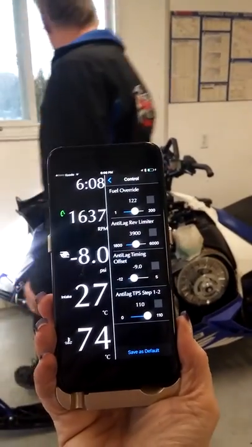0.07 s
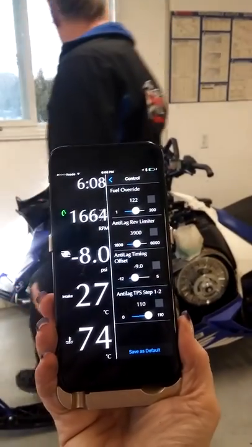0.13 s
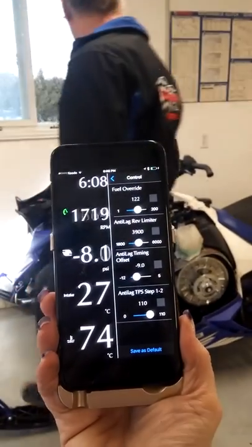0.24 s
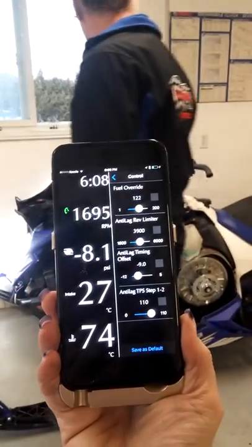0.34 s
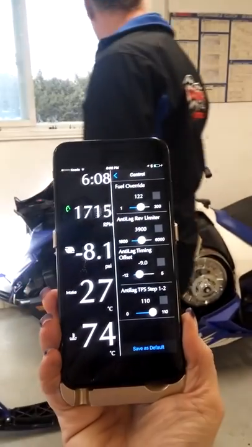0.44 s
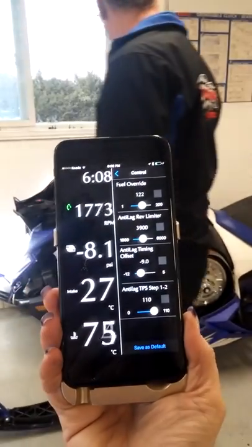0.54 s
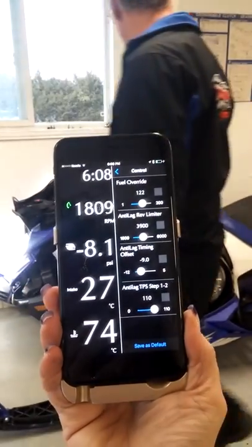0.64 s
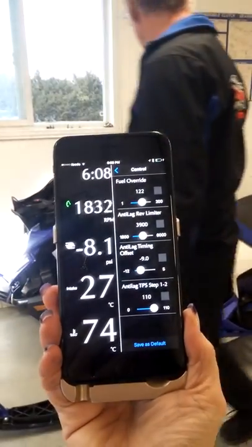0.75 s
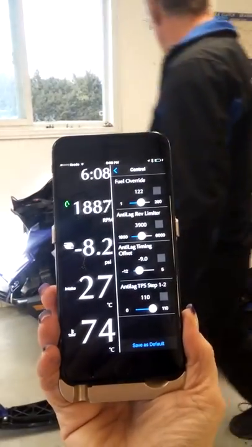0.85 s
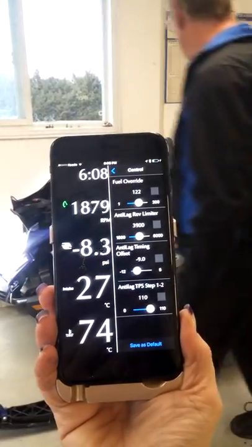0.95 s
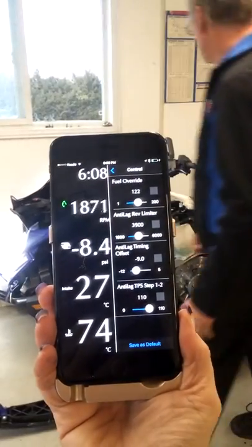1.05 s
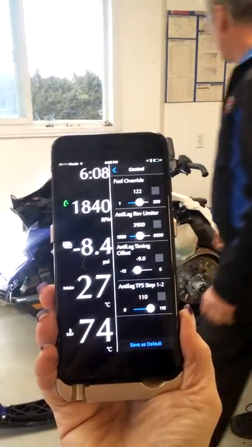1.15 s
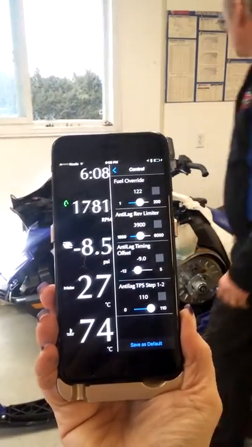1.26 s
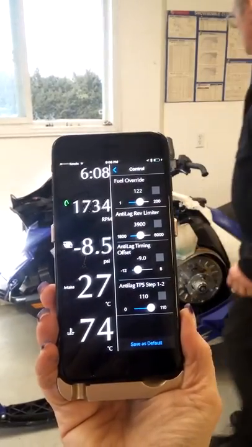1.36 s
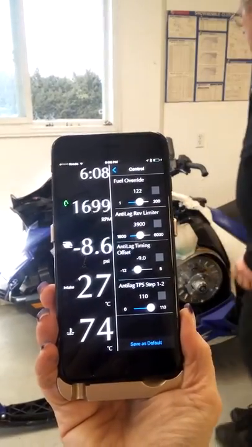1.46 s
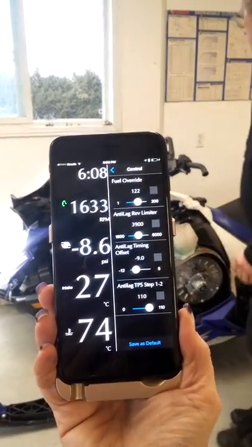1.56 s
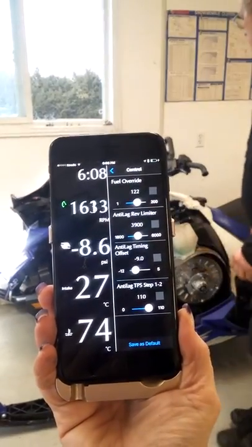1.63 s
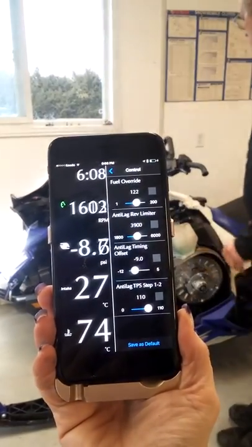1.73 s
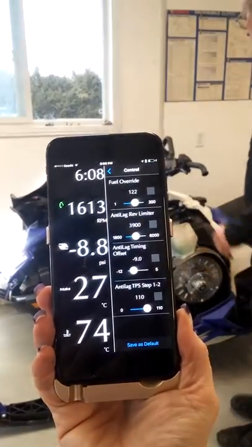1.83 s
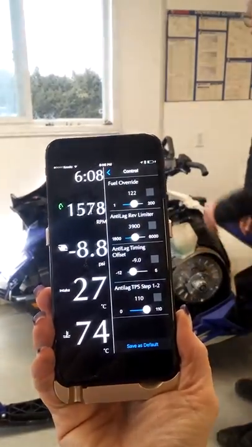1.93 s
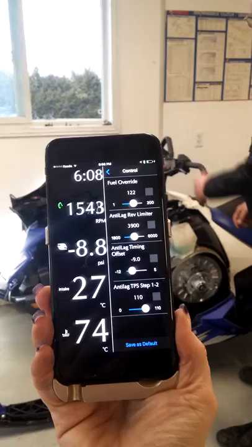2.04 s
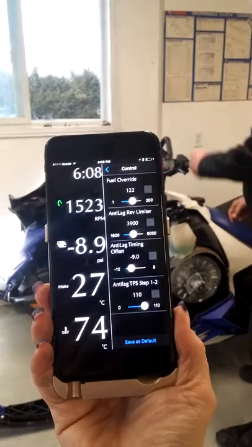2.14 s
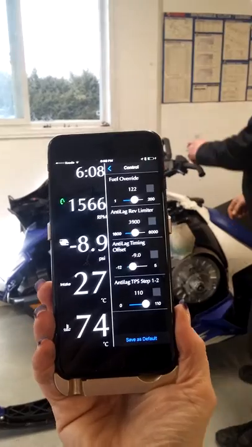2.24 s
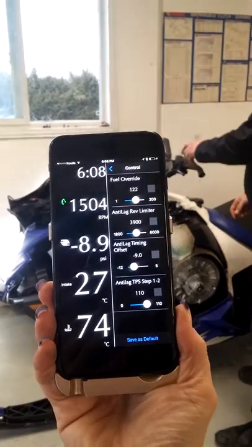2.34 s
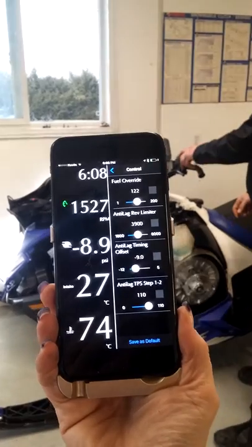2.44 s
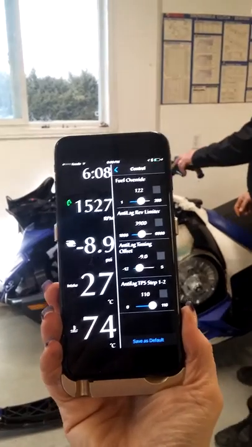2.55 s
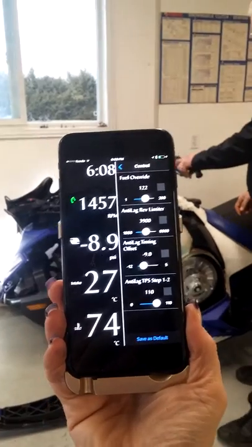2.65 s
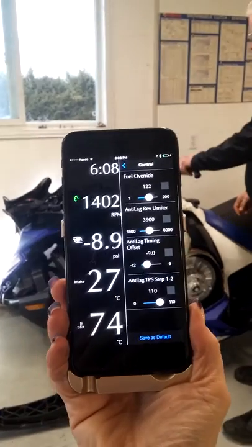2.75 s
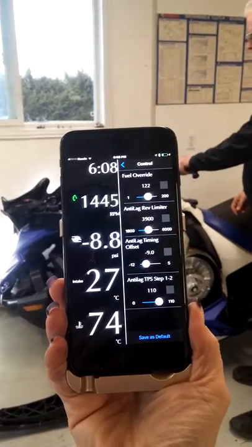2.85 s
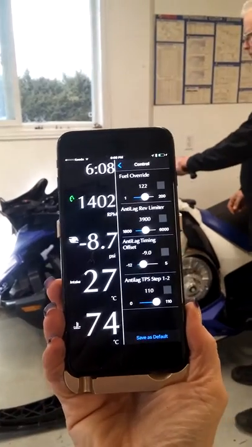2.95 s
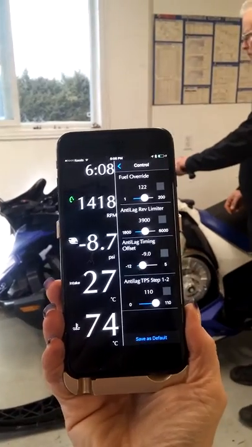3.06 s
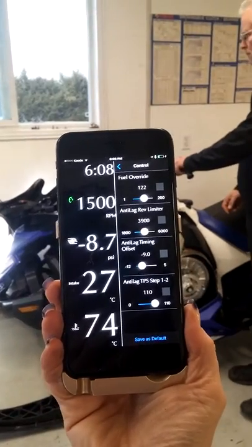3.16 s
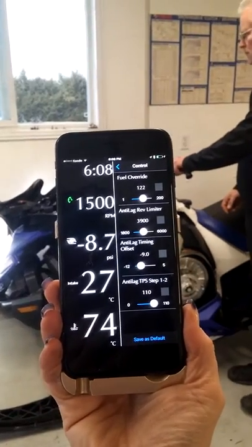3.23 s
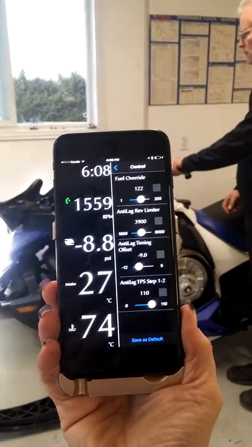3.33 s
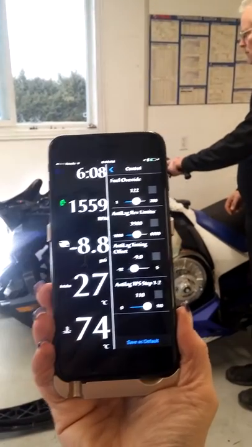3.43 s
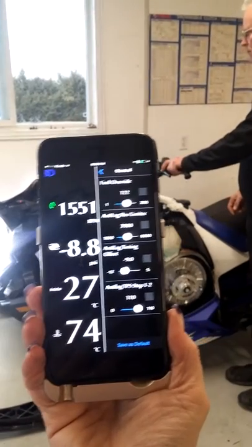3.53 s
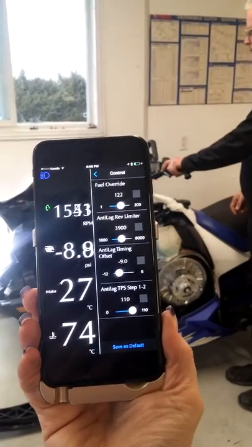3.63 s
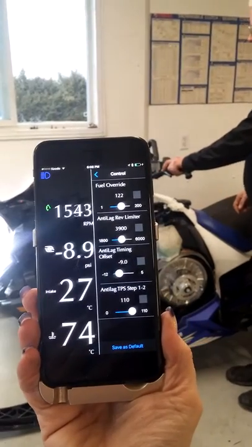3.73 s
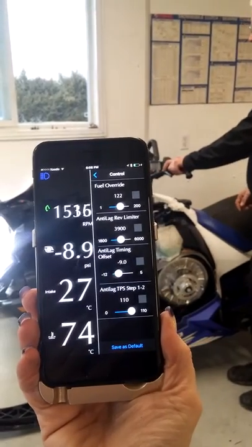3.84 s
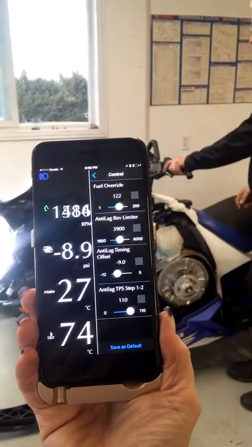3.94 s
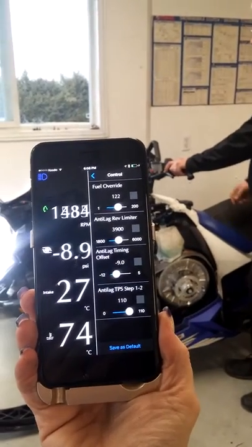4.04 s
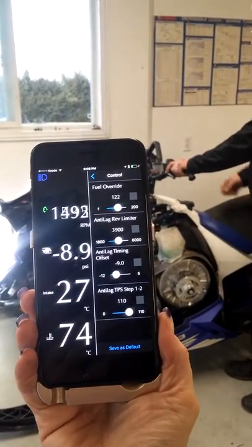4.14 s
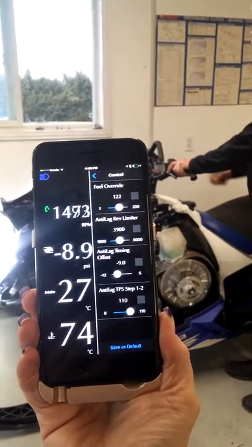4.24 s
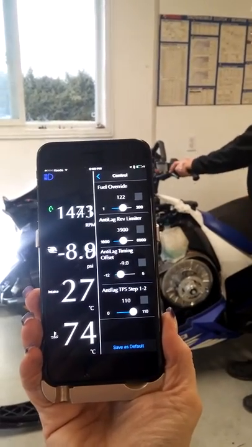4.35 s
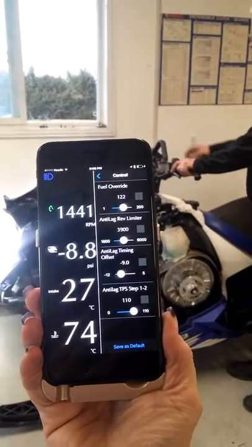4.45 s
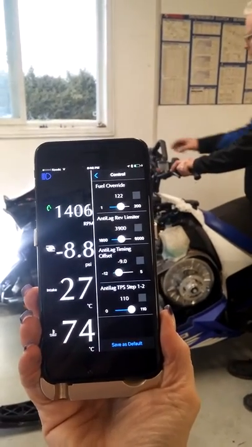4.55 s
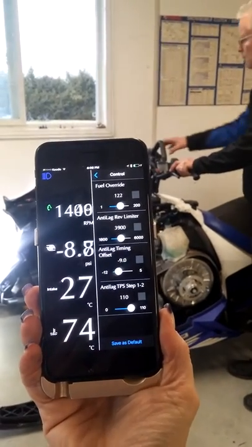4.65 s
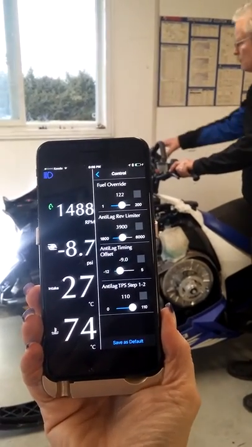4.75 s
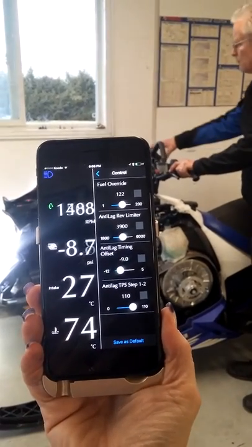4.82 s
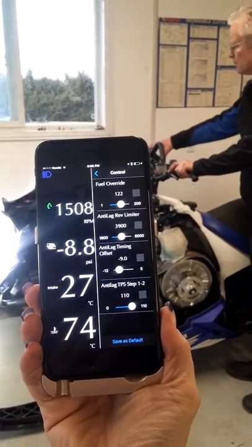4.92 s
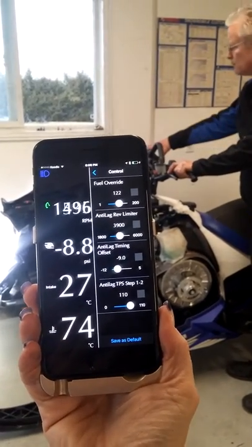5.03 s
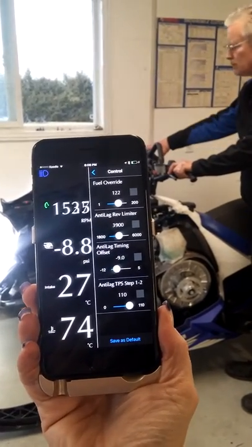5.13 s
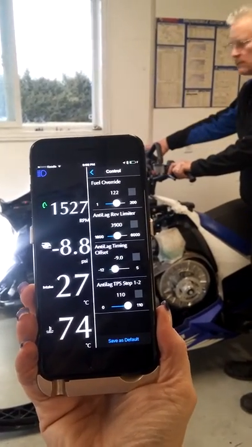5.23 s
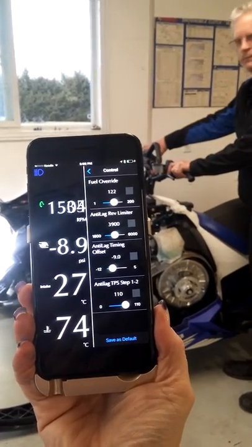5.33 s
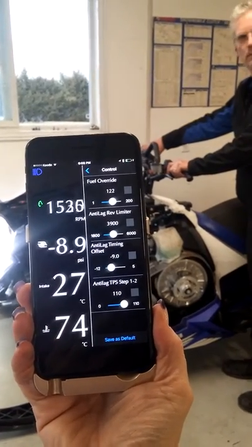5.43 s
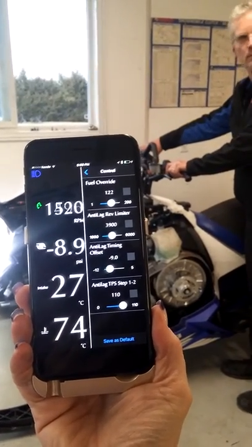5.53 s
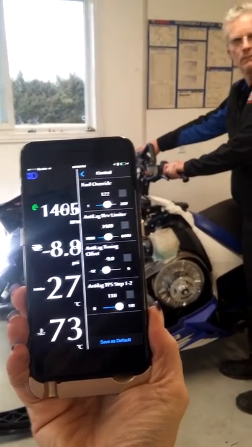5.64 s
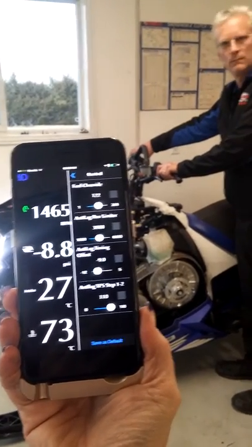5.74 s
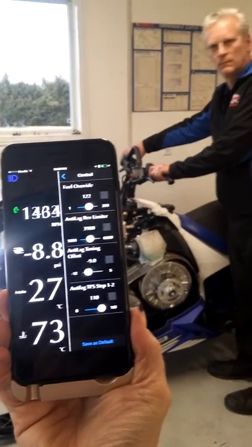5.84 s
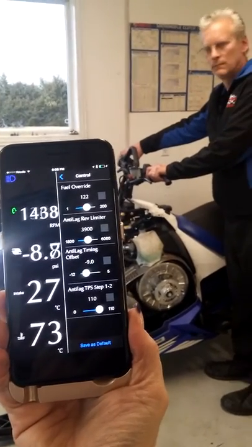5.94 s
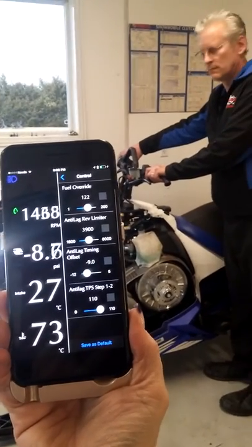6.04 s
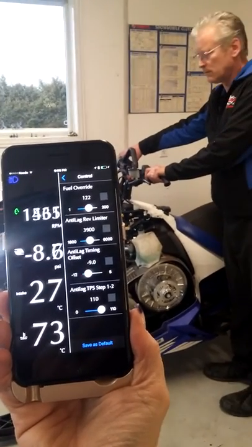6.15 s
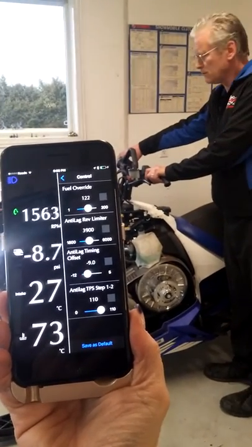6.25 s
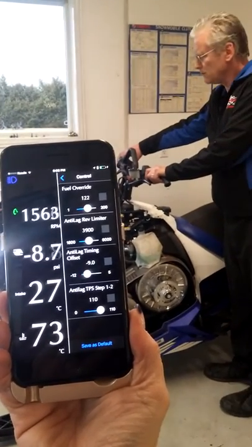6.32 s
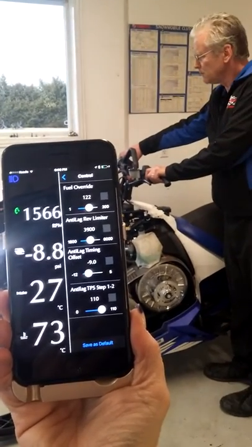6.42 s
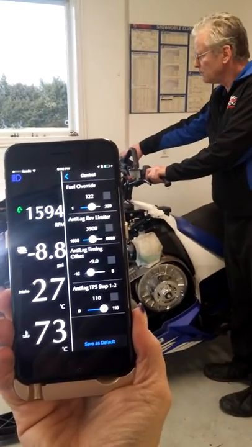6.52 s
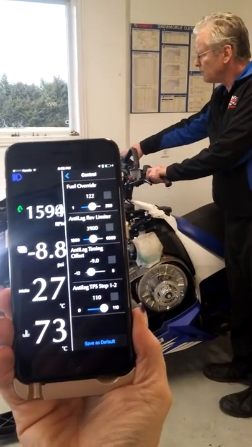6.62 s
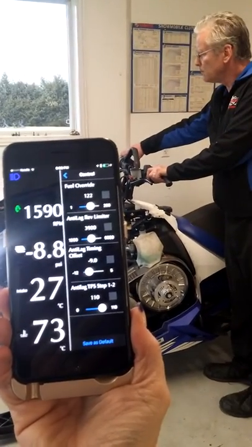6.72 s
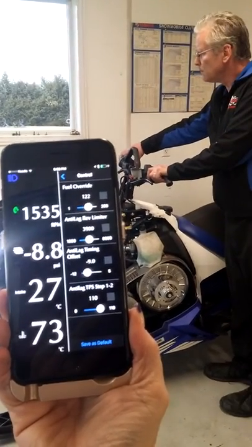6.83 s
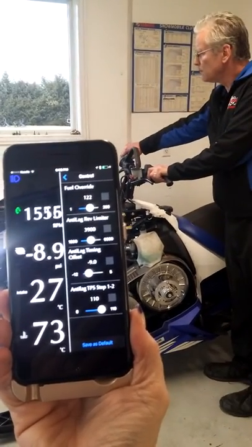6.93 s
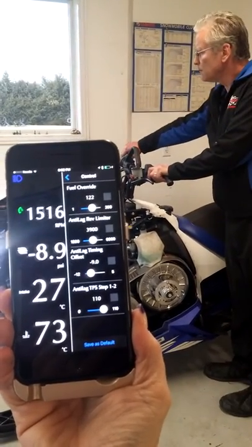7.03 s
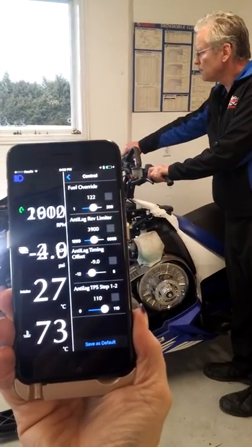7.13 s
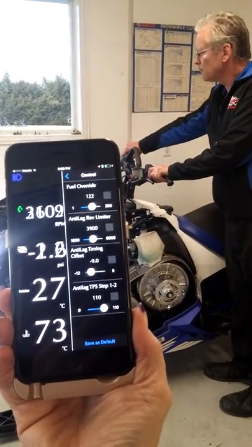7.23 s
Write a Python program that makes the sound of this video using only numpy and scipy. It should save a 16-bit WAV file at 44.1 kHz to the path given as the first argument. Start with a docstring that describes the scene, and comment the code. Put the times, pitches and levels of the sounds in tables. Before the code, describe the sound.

Uneven low engine idle with metallic clatter and airy intake hiss indoors, suddenly broken by a throttle stab and a volley of distorted exhaust explosions.

```python
"""A turbocharged three-cylinder snowmobile idles unevenly in a workshop, then the throttle is stabbed open.
Exhaust pulses, harmonics of the firing rate, sweep through fixed pipe and room resonances.
Over them lie clatter and intake hiss, noise gated by the crank, and early on a brief deep rumble.
At the end the anti-lag fires volleys of bangs, swinging tones with a noise roar, which overload the microphone."""
import sys
import numpy as np
from scipy import signal
from scipy.fft import rfft, irfft
from scipy.io import wavfile
from scipy.ndimage import uniform_filter1d, minimum_filter1d

SR = 44100
rng = np.random.default_rng(int(sys.argv[2]) if len(sys.argv) > 2 else 0)


def unload_audio(sound):
    """Save the sound as a 16-bit wav file, at the path given as the first command line argument."""
    columns = np.transpose(np.atleast_2d(sound))
    # keep every value between -1 and 1, then stretch to whole-number steps
    steps = np.round(np.clip(columns, -1, 1) * 32767)
    wavfile.write(sys.argv[1], SR, steps.astype(np.int16))


N = 321048
LEAD = SR // 4  # samples: the engine is already running before time zero
TIME = np.arange(-LEAD, N) / SR  # s
LENGTH = LEAD + N
SIZE = 2 ** 19  # transform length, samples
HZ = np.fft.rfftfreq(SIZE, 1 / SR)
FIRINGS = 512  # random draws are made for this many firings

# how hard the cylinders fire: [t/s, level above idle/dB]
EFFORT_CURVE = [(0, 8.5), (.9, 7.5), (1.4, 2), (2.3, 0), (6.9, 0)]
# the three cylinders in firing order: [strength/dB, lateness/share of one firing]
CYLINDER_TRAITS = [(1.42, 0.0027), (0.5, 0.0066), (0.9, -0.0021)]


def gain_of(db):
    """Decibels to amplitude gain."""
    return 10 ** (np.asarray(db) / 20)


def evened(x):
    """Scales to unit rms."""
    return x / np.sqrt(np.mean(x ** 2) + 1e-20)


def curve(rows):
    """A control curve at every sample, straight between its points."""
    return np.interp(TIME, *np.transpose(rows))


def shape(points, modes=()):
    """A spectrum in dB: straight lines over log frequency, plus resonant peaks and hollows."""
    hz, db = np.transpose(points)
    outline = np.interp(np.log(HZ + 1), np.log(hz + 1), db)
    resonances = sum(d / (1 + (2 * (HZ - f) / width) ** 2) for f, width, d in modes)
    return outline + resonances


def colour(x, db):
    """Causal minimum-phase filter with the given gain, so that resonances ring after each pulse."""
    cepstrum = irfft(np.log(gain_of(db)))
    # folding the cepstrum forward in time makes the filter causal
    cepstrum[1:SIZE // 2] *= 2
    cepstrum[SIZE // 2 + 1:] = 0
    response = np.exp(rfft(cepstrum))
    return irfft(rfft(x, SIZE) * response)[..., :LENGTH]


def workshop(x, t60):
    """Diffuse reflections, decaying 60 dB in t60 seconds and different at each microphone port."""
    t = np.arange(SR // 2) / SR
    taps = rng.standard_normal((2, len(t))) * (t > .003) * gain_of(-60 * t / t60)
    taps = taps / np.linalg.norm(taps[0])
    return signal.fftconvolve(np.atleast_2d(x), taps, axes=1)[:, :LENGTH]


def held(start, end, attack, release):
    """Rises from 0 to 1 from the start on, holds, and falls back after the end."""
    return np.clip(np.minimum((TIME - start) / attack, 1 - (TIME - end) / release), 0, 1)


def lull():
    """How far the engine is into its light spell shortly before the throttle opens, 0-1."""
    start_s, end_s, fade_s = 6.3, 6.93, .15
    return held(start_s, end_s, fade_s, fade_s)


def sag():
    """Firings a second lost as the idle droops smoothly and recovers."""
    # idle sags: [slowest at t/s, firings a second lost/Hz, slowing/s, recovery/s]
    sags = [(2.959, 3.451, 0.599, 0.364), (4.519, 2.477, 0.467, 0.528), (5.95, 3.634, 0.462, 0.33)]
    return sum(lost * np.sin(np.pi / 2 * held(s - slowing, s, slowing, recovery)) ** 2
               for s, lost, slowing, recovery in sags)


def speed():
    """Firings a second: the crank runs fast at first, then settles to a sagging idle."""
    # crank speed without the sags: [t/s, firing rate/Hz]
    crank = [(0.0, 40.716), (0.238, 42.53), (0.391, 42.65), (0.917, 47.137), (1.146, 46.317),
             (1.597, 40.415), (1.893, 39.9), (2.112, 38.243), (3.591, 38.793), (3.843, 37.964),
             (5.65, 38.038), (6.667, 39.833), (6.772, 38.683)]
    return curve(crank) - sag()


def brightness():
    """Harmonic slope in dB per octave: firings dull in a sag and sharpen as the crank gains speed."""
    idle_tilt, lull_tilt = -.2, 1.0  # dB per octave
    tilt_per_hz_sag, tilt_per_hz_per_s = 0.65, 0.044
    gaining = uniform_filter1d(np.gradient(speed()) * SR, size=SR // 4)
    return idle_tilt - tilt_per_hz_sag * sag() + tilt_per_hz_per_s * gaining + lull_tilt * lull()


def loudness(follow, shade_db, lull_db, stab_db):
    """Gain of a machine noise: follows effort, drops behind the mechanic and in the lull, leaps with throttle."""
    # a mechanic walks past the open clutch side and shades it from the microphone
    pass_s, pass_width_s = .95, 0.52
    shade = np.exp(-((TIME - pass_s) / pass_width_s) ** 2)
    # stabs of the throttle: [opens t/s, closes t/s]
    stabs = [(6.965, 7.02), (7.085, 7.3)]
    attack_s, release_s = 0.032, .11
    throttle = np.max([held(opens, closes, attack_s, release_s) for opens, closes in stabs], axis=0)
    dips_db = shade_db * shade + lull_db * lull() * (1 - throttle)
    return gain_of(follow * curve(EFFORT_CURVE) + dips_db + stab_db * throttle)


def strokes(turns, at, decay, spread_db):
    """A sharp rise and an exponential decay once a firing, its size drawn anew each time."""
    cycle = turns - at + 2
    size = gain_of(spread_db * rng.standard_normal(FIRINGS))
    return size[cycle.astype(int)] * np.exp(-(cycle % 1) / decay)


def rumble(level_db=-34, swell_s=0.62, length_s=0.092):
    """A brief deep rumble under the engine as it picks up speed: low noise in one smooth swell."""
    # [f/Hz, relative level/dB]
    spectrum = shape([(10, -8), (25, -41), (55, 21), (100, -6), (400, -45)])
    sound = colour(rng.standard_normal(LENGTH), spectrum)
    swell = np.exp(-((TIME - swell_s) / length_s) ** 2)
    return evened(sound) * gain_of(level_db) * swell


def intake(turns, level_db=-38.0, grain_db=2.0, wet_db=-7):
    """Air hisses past the throttle in two gulps a firing, with a fine rattle in it."""
    # hiss spectrum before levelling: [f/Hz, relative level per Hz/dB]
    hiss = [(500, -19), (1800, 1), (2600, -1), (3600, -3), (4200, 1.5), (4900, -7), (5600, -1.5),
            (6300, -5.5), (7000, 2.5), (7900, -2.5), (9900, 1), (11200, -8.5), (13500, -15), (15500, -34)]
    gulps = strokes(turns, at=.91, decay=.35, spread_db=2)
    gulps += .6 * strokes(turns, at=.32, decay=.17, spread_db=2)
    # one cylinder draws harder than the others
    gulps += .35 * strokes(turns / len(CYLINDER_TRAITS), at=.3, decay=.4, spread_db=2)
    # the rattle: a random level every 64 samples
    steps = TIME[::64]
    grain = gain_of(grain_db * np.interp(TIME, steps, rng.standard_normal(len(steps))))
    drive = (.9 + gulps) * grain * rng.standard_normal((2, LENGTH))
    sound = colour(drive + gain_of(wet_db) * workshop(drive, t60=0.13), shape(hiss))
    level = loudness(follow=0.77, shade_db=-6.5, lull_db=-6.3, stab_db=10.5)
    return np.sqrt(2) * evened(sound) * gain_of(level_db) * level


def clatter(turns, level_db=-32.0, steady=0.48, apart=1.0, wet_db=0):
    """Valves and the loose clutch knock the ringing covers in step with the crank."""
    # knocks within one firing: [place in the cycle/0-1, size/relative]
    knock_pattern = [(0.14, 0.85), (0.361, 0.85), (0.608, 0.62)]
    # clatter spectrum before levelling: [f/Hz, relative level per Hz/dB]
    outline = [(30, -59), (150, 4.5), (450, -6), (560, -13), (680, -8.5), (800, -9.5), (1000, -7.5),
               (1400, -3.5), (1700, -10), (1950, -23.5), (3000, -18), (6000, -24), (16000, -54)]
    # ringing of covers and clutch: [f/Hz, width/Hz, level/dB]
    covers = [(775, 25, 3), (850, 20, 3), (960, 25, 6), (1135, 25, 2), (1235, 25, 3.5), (1370, 36, 7.5),
              (1415, 50, 7), (1604, 36, 7.5), (3045, 65, 12.5), (3150, 70, 7)]
    knocks = sum(size * strokes(turns, at, decay=.12, spread_db=2) for at, size in knock_pattern)
    # the sound comes from one side and reaches the two ports out of step
    shared, lag = rng.standard_normal(LENGTH), 19  # lag in samples
    noise = np.array([shared, np.roll(shared, lag)]) + apart * rng.standard_normal((2, LENGTH))
    drive = (steady + knocks) * noise
    sound = colour(drive + gain_of(wet_db) * workshop(drive, t60=0.32), shape(outline, covers))
    level = loudness(follow=0.67, shade_db=-4.0, lull_db=-2.5, stab_db=3.5)
    return np.sqrt(2) * evened(sound) * gain_of(level_db) * level


def antilag(level_db=0, burn_s=0.017, pipe_hz=315, wander=.17, boom_hz=125, boom_db=-10, roar_db=-6.5, wet_db=-17):
    """Fuel explodes in the hot pipe: each bang sets pipe and silencer swinging, with a turbulent roar."""
    # bangs, before their onsets are smoothed: [t/s, level/dB]
    bangs = [(6.972, -23), (6.994, -11), (7.015, -6), (7.037, -13), (7.050, -23), (7.101, -19), (7.118, 3),
             (7.134, -4), (7.15, 2.5), (7.165, -9), (7.196, 5.5), (7.211, 1), (7.226, 8.5), (7.239, 0),
             (7.254, -7), (7.272, 4.5)]
    # the roar inside a bang, before levelling: [f/Hz, relative level per Hz/dB]
    blast = [(25, -12), (60, 3.5), (130, -1.5), (190, -1), (300, -1.5), (450, 0.5), (600, -9),
             (1000, -15.5), (1800, -30.5), (5000, -34.5), (16000, -41)]
    pressure = sum(gain_of(db) * (TIME >= s) * np.exp(-abs(TIME - s) / burn_s) for s, db in bangs)
    pressure = uniform_filter1d(pressure, size=110)
    # the flame keeps shifting the pitch of the gas column
    flame = evened(uniform_filter1d(rng.standard_normal(LENGTH), size=130))
    angle = 2 * np.pi * np.cumsum(1 + wander * flame) / SR
    swing = np.sin(pipe_hz * angle) + gain_of(boom_db) * np.sin(boom_hz * angle)
    roar = evened(colour(rng.standard_normal(LENGTH), shape(blast)))
    sound = gain_of(level_db) * pressure * (swing + gain_of(roar_db) * roar)
    return sound + gain_of(wet_db) * workshop(sound, t60=0.26)


def chambers(x):
    """Each silencer chamber delays its band without weakening it, which spreads a pulse over the stroke."""
    # chambers that hold their band back: [f/Hz, width/Hz]
    bands = [(122, 48.5), (176, 8.8), (303, 150)]
    lag = sum(2 * np.arctan2(HZ * width, hz ** 2 - HZ ** 2) for hz, width in bands)
    return irfft(rfft(x, SIZE) * np.exp(-1j * lag))[:LENGTH]


def exhaust(turns, level_db=0.45, lull_db=-1.2, wet_db=-21):
    """One pressure pulse a firing; its harmonics swell as they cross the standing waves."""
    # what the silencer lets through: [f/Hz, gain per harmonic/dB]
    silencer = [(35, -55.5), (50, -34), (70, -13.5), (110, -29.5), (200, -30), (300, -31.5), (380, -30),
                (450, -49), (600, -62), (900, -74.5)]
    # standing waves of pipe and room, peaks and hollows: [f/Hz, width/Hz, level/dB]
    standing = [(67, 14.6, -5.5), (84.8, 5.5, -6), (114.9, 13, 10), (139, 15.3, 14), (153.4, 5.2, -6),
                (178.5, 12.8, -8), (217.5, 5.8, -15), (230, 26, 7), (251.9, 4.5, -13), (278.3, 15.2, 8),
                (289, 19, -4), (309.8, 1.7, -8.5), (324.6, 27, 6.5), (341, 5.8, -12), (347.8, 17.4, 10.5),
                (360.5, 8, -6), (383.3, 17, 3), (409.4, 18.7, -14), (423.4, 24, 9.5), (490, 22, 5)]
    firing = np.arange(FIRINGS)
    strength_db, late = np.array(CYLINDER_TRAITS)[firing % len(CYLINDER_TRAITS)].T
    strength_db = strength_db + .55 * rng.standard_normal(FIRINGS)
    late = late + .003 * rng.standard_normal(FIRINGS)
    # the crank hunts a little over a handful of firings
    hunting = evened(np.convolve(rng.standard_normal(FIRINGS), np.hanning(11), "same"))
    late = late + .022 * hunting
    angle = 2 * np.pi * (turns - np.interp(turns, firing, late))
    hz, bright = speed(), brightness()
    # the slope of the harmonics pivots at 150 Hz
    pulses = -sum(gain_of(bright * np.log2(k * hz / 150)) * np.cos(k * angle) for k in range(1, 17))
    # gas tumbles out behind each pulse
    tumble = .06 * np.sqrt(SR / hz) * rng.standard_normal(LENGTH)
    puffs = tumble * strokes(turns, at=0, decay=.6, spread_db=2)
    firing_db = curve(EFFORT_CURVE) + lull_db * lull() + np.interp(turns, firing, strength_db)
    drive = (pulses + puffs) * gain_of(level_db + firing_db)
    sound = chambers(colour(drive, shape(silencer, standing)))
    return sound + gain_of(wet_db) * workshop(sound, t60=0.34)


def scene():
    """All parts but rumble and bangs follow the crank; the two microphone ports hear each band differently."""
    # balance of the ports: [f/Hz, left minus right level/dB]
    lean = [(60, 5), (90, 3.5), (140, -1), (210, 5.5), (330, -3), (770, 2.5), (1500, -0.3), (2740, -1.5),
            (4190, 1), (6410, -6.5), (9800, -11), (13000, 3.5)]
    turns = np.cumsum(speed()) / SR + 2.83  # crank position, counted in firings
    engine = exhaust(turns) + clatter(turns) + intake(turns) + antilag() + rumble()
    ports = gain_of(np.array([[.5], [-.5]]) * shape(lean))
    ports /= np.sqrt(np.mean(ports ** 2, axis=0))
    return irfft(rfft(engine, SIZE) * ports)[:, LEAD:LENGTH]


def record(dry):
    """A limiter takes back part of each overload, the rest is flattened; then the band limit."""
    ceiling, hold, edge_hz = .78, .4, 15200  # full scale 1; share of the overload in dB taken back
    peak = -minimum_filter1d(-abs(dry).max(axis=0), size=600)
    over = uniform_filter1d(np.maximum(peak / ceiling, 1), size=500)
    limited = dry / over ** hold
    clipped = limited / (1 + (limited / ceiling) ** 16) ** (1 / 16)
    lowpass = signal.firwin(511, edge_hz, window=("kaiser", 9), fs=SR)
    return signal.oaconvolve(clipped, lowpass[None], "same")


dry = scene()
out = record(dry)
unload_audio(out)
```